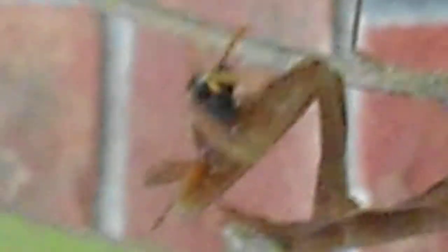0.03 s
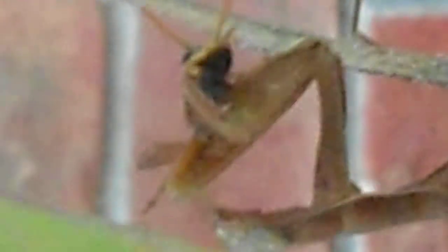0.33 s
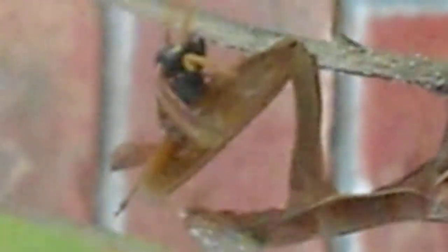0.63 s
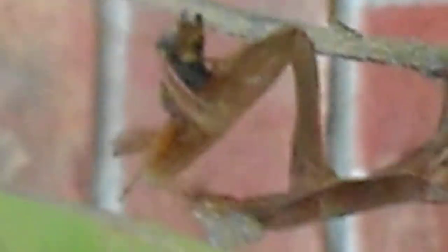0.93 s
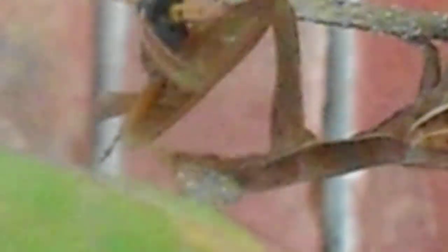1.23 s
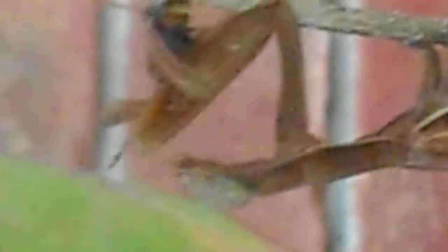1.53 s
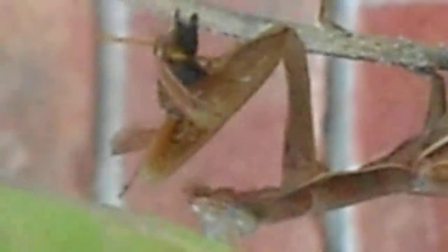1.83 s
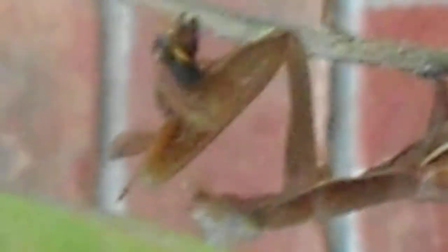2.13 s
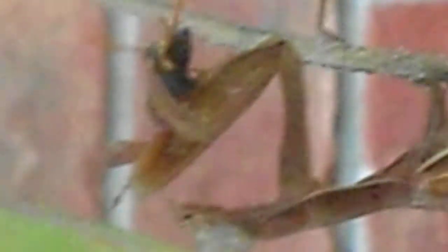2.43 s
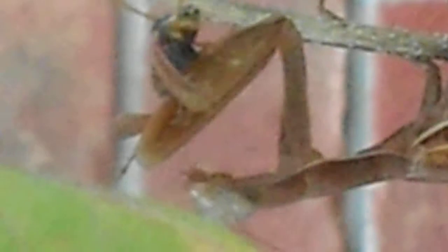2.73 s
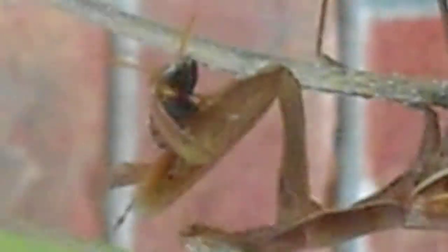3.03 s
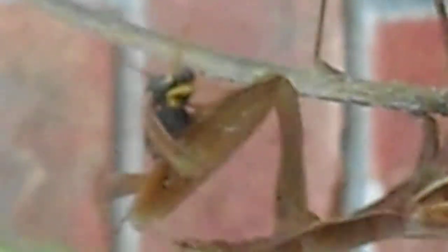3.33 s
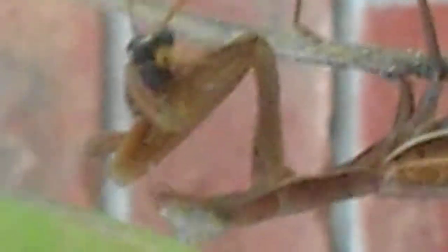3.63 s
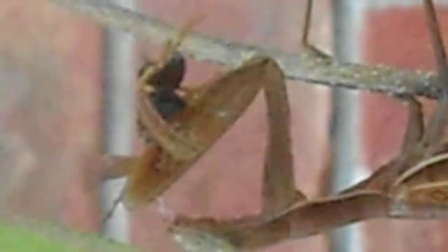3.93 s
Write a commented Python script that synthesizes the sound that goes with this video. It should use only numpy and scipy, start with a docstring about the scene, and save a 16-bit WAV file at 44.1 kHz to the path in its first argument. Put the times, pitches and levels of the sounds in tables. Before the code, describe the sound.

Outdoors, a small motor hums at a distance with light clatter and a thin whine, above far traffic rumble. Faint crackly finger rustles on the hand-held microphone come first, then a brief bump, after which the volume dips and recovers.

```python
"""A small engine, perhaps a mower, drones some way off over the wash of distant traffic.
It fires at a nearly steady rate, which makes its hum, its clatter and a thin whine.
Fingers rustle on a hand-held camera as skin sticks and slips, then scrape it with a short bump.
The camera's automatic volume control turns down at the bump and creeps back up."""
import sys
import numpy as np
from scipy import signal
from scipy.fft import rfft, irfft
from scipy.io import wavfile
from scipy.ndimage import uniform_filter1d, map_coordinates

SR = 44100
rng = np.random.default_rng(int(sys.argv[2]) if len(sys.argv) > 2 else 0)


def store_pcm(level_fs):
    """Save levels as 16-bit WAV."""
    pcm = np.round(np.clip(level_fs, -1, 1) * 32767).astype(np.int16)
    wavfile.write(sys.argv[1], SR, np.atleast_2d(pcm).T)


N = 176400

# How many times a second the engine fires: time_s, rate_hz
FIRING_RATE = [(0, 34.46), (0.35, 34.6), (0.7, 34.79), (1.15, 34.84), (1.6, 34.29), (2.0, 34.38),
               (2.4, 34.47), (2.7, 34.39), (2.9, 34.18), (3.2, 34.45), (3.6, 34.5), (4.0, 34.65)]
FADES_PER_S = 3.943  # how often each engine tone wavers in strength


def undb(db):
    """Turn decibels into a number to multiply by."""
    return 10 ** (np.asarray(db) / 20)


def curve(rows, column=1):
    """One column of a table, joined by straight lines in time."""
    rows = np.array(rows, float)
    return np.interp(np.arange(N) / SR, rows[:, 0], rows[:, column])


def wander(per_s):
    """A smooth random wobble, about 1 in size."""
    knots = rng.standard_normal(400)
    coarse = map_coordinates(knots, [np.linspace(0, per_s * N / SR, 2000)], order=3, mode="mirror")
    return np.interp(np.linspace(0, 1, N), np.linspace(0, 1, len(coarse)), coarse)


def colour(x, points, keep_power=False):
    """Filter by (pitch_hz, gain_db) points; keep_power leaves white noise as strong as it was."""
    hz, db = np.array(points, float).T
    size = 2 * N
    gain = undb(np.interp(np.log(np.arange(N + 1) * SR / size + 1), np.log(hz), db))
    if keep_power:
        gain = gain / np.sqrt(np.mean(gain ** 2))
    # Make the filter ring only after a sound, never before it.
    cepstrum = irfft(np.log(gain))
    cepstrum[1:N] *= 2
    cepstrum[N + 1:] = 0
    return irfft(rfft(x, size) * np.exp(rfft(cepstrum)))[:N]


def hiss():
    """White noise at 0 dB per Hz."""
    return rng.standard_normal(N) * np.sqrt(SR / 2)


def slip(start_s, length_s, rise_s=0.002):
    """The strength of one slip of skin: a quick rise, then it dies away."""
    age = np.maximum(np.arange(N) / SR - start_s, 0)
    return np.minimum(age / rise_s, 1) / (1 + (age / length_s) ** 4)


def crackle(spread_db=1.5):
    """Skin sticks and slips in tiny, crowded clicks of uneven size."""
    noise = rng.standard_normal(N)
    click_db = spread_db * np.repeat(rng.standard_normal(N // 30 + 1), 30)[:N]
    clicks = noise * undb(click_db)
    return clicks / clicks.std()


def engine_cycles(wobbles_per_s, wobble_share=0.001525):
    """A running count of firings, for an engine whose speed wobbles slightly."""
    return np.cumsum(curve(FIRING_RATE) * (1 + wobble_share * wander(wobbles_per_s))) / SR


def traffic():
    """Distant traffic blends into a broad, gently wavering wash with hiss on top."""
    # Rumble and hiss of the wash: pitch_hz, level_db_per_hz
    wash = [(22, -81.5), (33, -54.5), (55, -61), (90, -54.5), (125, -54.5), (170, -60.5), (215, -64),
            (290, -63.5), (450, -66.5), (750, -68.5), (1200, -69.5), (1550, -74), (1780, -74), (2050, -79),
            (2700, -83.5), (3400, -85), (4200, -92), (4800, -99.5), (6500, -100.5), (8300, -93.5),
            (10300, -86.5), (11400, -98.5), (12000, -104)]
    # Its slow rise and fall: time_s, gain_db
    swell = [(0, -1), (.7, 1), (1.2, .5), (1.6, -0.5), (2.1, 0), (2.55, -0.5), (3.2, -.5), (3.7, 0),
             (4, 0.5)]
    return colour(hiss(), wash) * undb(curve(swell) + 0.2 * wander(9.43))


def finger_rustle():
    """Skin slips on the camera: a fine crackle, with a lower rasp when pressed harder."""
    # Finger slips: start_s, length_s, level_db, rasp_db (added to level_db and rasp_trim_db)
    rustles = [(0.695, .006, -39.5, -3), (0.721, .005, -39, -14), (0.729, 0.0039, -32, -12),
               (0.872, .008, -41.5, -12), (0.891, 0.019, -40, -10), (0.923, 0.0093, -42, -9),
               (1.03, 0.0071, -43, -4), (1.197, 0.0094, -42, -4), (1.248, 0.021, -43.5, -3),
               (1.277, 0.0015, -21.5, -11), (1.284, .008, -35.5, -3), (1.294, 0.014, -46, 7),
               (1.321, .010, -32, -2), (1.34, .03, -48, 2.5), (1.365, 0.011, -34.5, 2),
               (1.376, 0.029, -42, -2), (1.432, 0.0091, -39.5, 2), (1.45, 0.02, -45.5, -10),
               (1.482, .012, -39, -18), (1.529, 0.017, -43.5, 4), (1.569, 0.0093, -42.5, -0.5),
               (1.913, .02, -44, -0.5), (1.94, .02, -50, -4), (2.552, 0.024, -45, 3),
               (2.611, 0.0035, -33, 0)]
    # Tone of lightly rubbing skin: pitch_hz, gain_db
    skin_tone = [(3000, -34), (6000, -22), (8000, -9.5), (9400, 2), (10300, 5.5), (11300, -6.5),
                 (12200, -9)]
    # Tone of the lower rasp: pitch_hz, gain_db
    rasp_tone = [(1000, 3), (2600, -3), (3300, 4.5), (4500, -1.5), (6500, -3), (7700, 3), (9500, -10),
                 (12000, -11)]
    rasp_trim_db = -6
    tail_db, tail_s = -23.5, 0.066  # the finger slides on softly after each slip
    fine_power, rasp_power = np.zeros(N), np.zeros(N)
    for start_s, length_s, level_db, rasp_db in rustles:
        rub = undb(level_db) * (slip(start_s, length_s) + undb(tail_db) * slip(start_s, tail_s))
        fine_power += rub ** 2
        rasp_power += (rub * undb(rasp_db + rasp_trim_db)) ** 2
    fine = colour(np.sqrt(fine_power) * crackle(), skin_tone, keep_power=True)
    rasp = colour(np.sqrt(rasp_power) * crackle(), rasp_tone, keep_power=True)
    return fine + rasp


def grip_bump():
    """The grip judders over the camera's case in a few quick slips."""
    # Slips of the grip: start_s, length_s, level_db
    scrapes = [(2.635, 0.0047, -18), (2.6391, 0.012, -16), (2.650, 0.0055, -24), (2.653, 0.0046, -22.5),
               (2.66, 0.0036, -16), (2.666, 0.0098, -17), (2.679, 0.0066, -27)]
    # Tone of the scraped case: pitch_hz, gain_db
    case_tone = [(100, 0), (250, 3.5), (500, 1), (900, 4.5), (1250, -2), (1600, -10.5), (2150, -9.5),
                 (3000, -17), (3700, -16), (4500, -24), (6500, -27), (8500, -14.5), (10300, -3.5),
                 (11500, -17), (12200, -21)]
    force = sum(undb(level_db) * slip(start_s, length_s) for start_s, length_s, level_db in scrapes)
    return colour(force * crackle(), case_tone, keep_power=True)


def engine_whine():
    """Faint, high mechanical tones follow the engine's speed and fade in and out."""
    # Tones of the whine: multiple (of the firing rate), level_db (before the swell)
    tones = [(49, -55.5), (55, -63), (92, -64.5), (94, -69.5)]
    # Rise and fall of the whine: time_s, gain_db
    swell = [(0, 0), (.6, 5.5), (1.25, 0), (1.7, -8), (3, -1), (4, -2)]
    cycles = engine_cycles(wobbles_per_s=13)
    whine = np.zeros(N)
    for multiple, level_db in tones:
        gain = undb(level_db + 2 * wander(FADES_PER_S))
        whine += gain * np.cos(2 * np.pi * (multiple * cycles + rng.random()))
    return np.sqrt(2) * whine * undb(curve(swell))


def engine_drone():
    """Exhaust pulses hum, their higher tones scattered on the way; each firing adds a puff of clatter."""
    # Exhaust tones: multiple (of the firing rate), level_db (before swells and fading)
    tones = [(1, -56), (2, -36), (3, -37), (4, -29.5), (5, -33.5), (6, -52), (7, -45), (8, -41), (9, -59.5),
             (10, -50.5), (11, -48), (12, -50.5), (13, -47.5), (14, -48.5), (15, -48.5), (16, -51),
             (17, -64), (18, -60), (19, -48.5), (20, -44), (21, -50), (22, -55), (23, -53.5), (26, -67.5),
             (30, -66.5), (34, -49), (36, -55.5), (38, -53.5), (40, -52), (42, -57), (43, -57.5),
             (47, -57.5), (49, -57), (50, -57), (51, -57.5), (54, -65)]
    # Swells: time_s, tone_4_db, tone_5_db, tone_8_db, upper_db (all higher tones and the clatter)
    swells = [(0, -1.5, -6, 1, 1.5), (.45, 0.5, -4.5, 0.5, -1.5), (.75, 3, -6.5, -10, 0.5),
              (1.2, 2, -2.5, -2.5, 0), (1.5, -3.5, -6, -4, -6.5), (2.0, -3, 1, 6, -0.5),
              (2.3, -0.5, -1, -0.5, 0.5), (2.55, 3, 0.5, -1, 3), (2.9, 0, -4, 0, 0.5),
              (3.25, -4, 3.5, -3.5, 3.5), (3.55, -1.5, 2.5, -15, 1.5), (3.8, -9, 3.5, 1.5, 3),
              (4, -11, 1.5, 7.5, 2.5)]
    # Tone of the clatter: pitch_hz, level_db_per_hz
    clatter_tone = [(150, -78.5), (280, -66.5), (500, -72), (900, -72), (1750, -85.5), (2200, -93.5),
                    (4000, -100)]
    smear_hz = 141.5  # reflections scramble the exhaust pulse above this pitch
    swell_column = {4: 1, 5: 2, 8: 3}
    cycles = engine_cycles(wobbles_per_s=14)
    upper_swell = undb(curve(swells, column=4))
    hum = np.zeros(N)
    for multiple, level_db in tones:
        pitch_hz = multiple * FIRING_RATE[0][1]
        gain = undb(level_db)
        if multiple in swell_column:
            gain = gain * undb(curve(swells, swell_column[multiple]))
        elif multiple > 8:
            gain = gain * upper_swell
        scramble = min((pitch_hz / smear_hz) ** 2, np.pi) * rng.uniform(-0.91, 1)
        angle = 2 * np.pi * multiple * cycles + scramble
        fade = np.clip(0.045 + 0.76 * pitch_hz / 1000, 0, 0.75)  # higher tones waver more
        steady = np.sqrt(2 * (1 - fade ** 2)) * np.cos(angle)
        scattered = wander(FADES_PER_S) * np.cos(angle) + wander(FADES_PER_S) * np.sin(angle)
        hum += gain * (steady + fade * scattered)
    puff = np.exp(-(cycles % 1) / 0.41)  # dies away within each cycle
    puff /= np.sqrt(np.mean(puff ** 2))
    clatter = colour(hiss() * puff, clatter_tone + [(8000, -120)])
    return hum + upper_swell * clatter


def scene():
    """Engine and traffic far off, fingers right at the microphone."""
    return (engine_drone() + engine_whine() + traffic() + finger_rustle() + grip_bump())[None]


def record(dry):
    """The camera turns loud sound down fast, recovers slowly, and cuts parts of the treble."""
    limit_db, recovery_db_per_s, window_s, sense_above_hz = -25, 9.5, 0.01, 505
    lag_s, lag_share = 0.037, 0.31  # part of each volume change comes a little late
    notch_hz, top_hz = 5512, 11650
    sensed = signal.sosfilt(signal.butter(2, sense_above_hz, "high", fs=SR, output="sos"), dry[0])
    power = np.maximum(uniform_filter1d(sensed ** 2, int(window_s * SR)), 1e-12)
    over_db = np.maximum(10 * np.log10(power) - limit_db, 0)
    recovery_db = recovery_db_per_s * np.arange(N) / SR
    cut_db = np.maximum.accumulate(over_db + recovery_db) - recovery_db
    smoothing = np.exp(-1 / (lag_s * SR))
    late_db = signal.lfilter([1 - smoothing], [1, -smoothing], cut_db)
    out = dry * undb(-cut_db - lag_share * (late_db - cut_db))
    # Take out two bands of treble, then everything above top_hz.
    for pitch_hz, width_hz in ((notch_hz, 1700), (2 * notch_hz, 700)):
        out = signal.lfilter(*signal.iirnotch(pitch_hz, pitch_hz / width_hz, fs=SR), out)
    return signal.sosfilt(signal.ellip(8, 0.2, 80, top_hz, fs=SR, output="sos"), out)


dry = scene()
out = record(dry)
store_pcm(out)
```